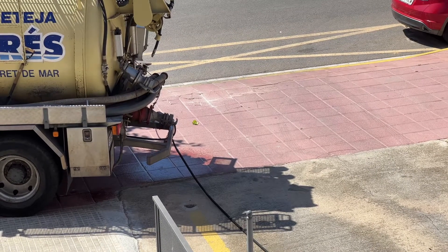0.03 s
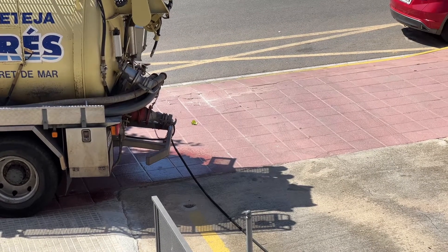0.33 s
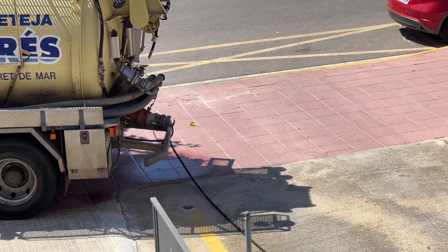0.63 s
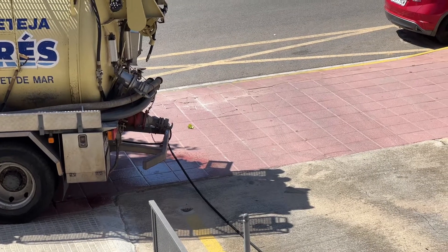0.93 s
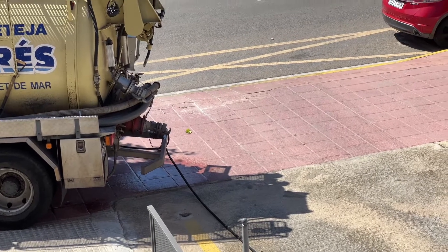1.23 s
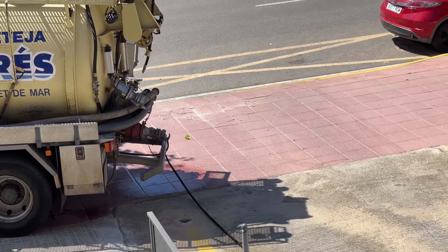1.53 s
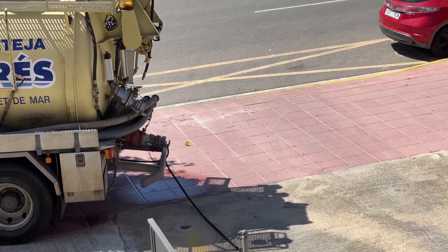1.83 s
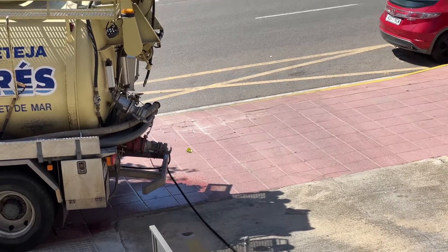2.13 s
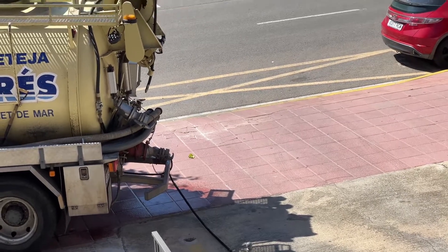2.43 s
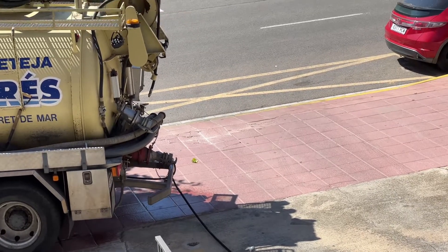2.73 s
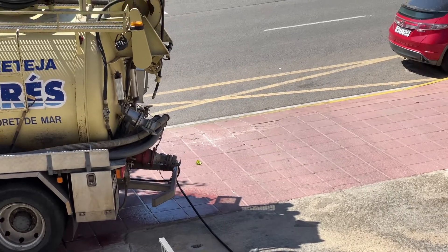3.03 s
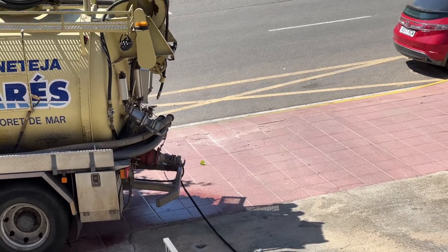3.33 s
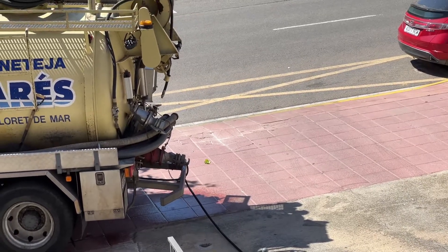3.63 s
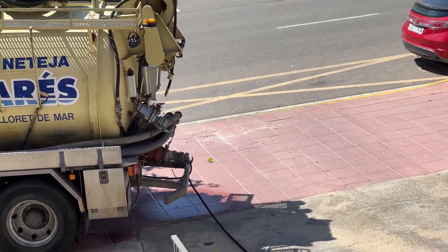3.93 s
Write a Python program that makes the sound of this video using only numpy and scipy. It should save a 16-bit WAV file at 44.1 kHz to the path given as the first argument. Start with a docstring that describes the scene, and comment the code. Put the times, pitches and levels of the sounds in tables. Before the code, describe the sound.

A tanker truck runs its pump at fast idle, droning, knocking and hissing outdoors.

```python
"""Beside a road, a tanker truck stands with its six-cylinder diesel at fast idle, driving a pump.
The pump has three plungers. On every turn its valves groan as liquid is forced past them, and its
strokes knock the pipes, always in the same pattern. Under that the engine drones, its casing rattles,
its fuel injectors tick and the machinery hisses. The exhaust booms louder towards the end,
and a few puffs of wind bump the microphone."""
import sys
import numpy as np
from scipy import signal
from scipy.fft import rfft, irfft, next_fast_len
from scipy.io import wavfile
from scipy.ndimage import map_coordinates

SR = 44100
rng = np.random.default_rng(int(sys.argv[2]) if len(sys.argv) > 2 else 0)


def store_wav(level_fs):
    """Save 16-bit WAV to argv[1]."""
    pcm = np.round(np.clip(np.atleast_2d(level_fs), -1, 1) * 32767)
    wavfile.write(sys.argv[1], SR, pcm.T.astype(np.int16))


N = 176400

FIRING_HZ, PUMP_TURN_S = 47.29, .22555  # in one engine cycle, each cylinder fires once

# tones of the engine block and chassis: (multiple of the engine cycle rate, level [dB])
BLOCK_TONES = [(27, -47.5), (30, -45.5), (36, -49), (37, -49), (39, -45), (42, -49.5), (58, -49.5),
               (76, -47.5), (99, -53.5), (149, -60)]
# how the low drone rises and falls: (time [s], gain [dB])
DRONE_GAIN = [(0, -8.5), (.3, -6), (.6, 1.5), (1, 0), (1.45, -3.5), (1.9, 2), (2.4, 0.5), (3.2, 0.5),
              (4, 0.5)]
# tones of the exhaust: (multiple of the engine cycle rate, relative level [dB])
EXHAUST_TONES = [(6, 0), (9, -8.5), (12, -2), (16, -4.5)]
# how loudly the exhaust booms: (time [s], level [dB])
EXHAUST_LEVEL = [(0, -44), (.4, -48), (1.5, -43.5), (1.9, -41), (2.6, -53), (2.85, -41.5), (3.1, -37),
                 (3.6, -35), (4, -33)]
# slight drift of the casing rattle and the hiss: (time [s], gain [dB])
RATTLE_HISS_GAIN = [(0, 0.9), (.8, 1), (1.6, 1), (2.6, 0.57), (4, 0.5)]
# how loudly the casing rings: (time [s], level [dB])
RING_LEVEL = [(0, -52.5), (.7, -48.5), (1.1, -51.5), (1.6, -53), (2.6, -53), (4, -54)]
# each cylinder's injector tick, in firing order: (relative level [dB])
CYLINDER_TICKS = [-2.5, -38, 4, 8, 7, -14]
# valve groans: (time in the turn [s], rise [s], fall [s], level [dB])
VALVE_GROANS = [(.037, .005, .0035, -35), (.0515, .004, .0042, -27.5), (.114, .0026, .003, -28),
                (.124, .004, .013, -26.5), (.08, .025, .06, -42.5)]
# pitch of the fluttering valve: (time in the turn [s], pitch [Hz])
VALVE_PITCH = [(0, 925), (.05, 922), (.1, 905), (.12, 890), (.14, 902), (.2255, 900)]
# pump knocks: (time in the turn [s], rise [s], fall [s], pitch [Hz], band width [Hz], level [dB])
PUMP_KNOCKS = [(0.03, 0.0091, 0.012, 1000, 130, -52), (0.1275, 0.0043, 0.0063, 810, 280, -44.5),
               (0.113, 0.0044, 0.0081, 1235, 160, -40), (.185, 0.0043, .007, 590, 130, -34),
               (0.2012, 0.0072, 0.0064, 738, 98, -32), (0.2, 0.0083, 0.013, 488, 144, -40),
               (0.218, 0.0042, 0.0095, 311, 54, -32.5), (0.1436, 0.0074, 0.008, 304, 31, -37.5)]
# the rush from each plunger: (time in the turn [s], rise [s], fall [s], level [dB])
PLUNGER_RUSHES = [(.044, .006, .005, -44.5), (.116, 0.0046, .008, -46.5), (.186, 0.0077, 0.013, -40.5)]
# short spurts of hiss: (time [s], band centre [Hz], level [dB])
HISS_SPURTS = [(.71, 5200, -49.5), (.86, 5130, -48), (2.234, 5060, -49), (2.255, 4420, -50),
               (2.287, 3760, -50), (2.748, 5160, -50), (2.992, 5240, -56), (3.117, 5200, -48),
               (3.138, 5150, -50)]
# soft puffs of wind: (time [s], rise and fall [s], level [dB])
WIND_PUFFS = [(0.077, 0.061, -35), (0.58, 0.02, -35), (0.73, 0.01, -36), (0.788, 0.0095, -22.5),
              (1.166, 0.038, -26.5), (2.18, 0.0079, -27), (2.578, 0.016, -45)]
# hard slaps of wind: (time [s], starting pitch [Hz], level [dB])
WIND_SLAPS = [(1.109, 520, -8.5), (1.119, 180, -14), (1.127, 340, -10), (1.144, 620, -8.5),
              (1.157, 190, -10.5), (1.168, 110, -17)]

# the tone colour of each noise: (frequency [Hz], relative level [dB])
RUMBLE_COLOUR = [(20, -34), (33, -27), (45, 6), (65, 3), (110, -0.5), (170, -0.5), (220, -1.5), (320, -1.5),
                 (400, -4.5), (600, -36), (1200, -71)]
RATTLE_COLOUR = [(150, -41), (300, -10.5), (420, 0.5), (590, 2), (680, -2), (900, 3), (1100, -5.5),
                 (1400, -4.5), (1620, -11), (2000, -8.5), (2500, -11.5), (2720, -11.5), (3000, -14.5),
                 (3350, -16.5), (3900, -23), (6000, -71)]
RING_COLOUR = [(2450, -28), (2610, -8), (2700, 6), (2790, -14), (2920, 0.5), (3040, -14), (3350, -4),
               (3600, -40)]
TICK_COLOUR = [(2000, -33), (4000, -9), (5200, 6), (5750, 1), (6200, 9), (6700, -12), (9000, -9),
               (10000, -48)]
RUSH_COLOUR = [(600, -27), (1200, 8), (1800, 5), (2350, 4), (2800, -11), (3400, -3), (3800, -7.5),
               (4300, -10), (5500, -21), (9000, -96)]
HISS_COLOUR = [(1500, -4), (3300, -10.5), (4000, -3.5), (4600, 0), (5200, 3.5), (5700, -2.5), (6000, 3.5),
               (6280, 4.5), (6500, -3.5), (6900, -5), (7480, -9), (7650, -5), (7850, -9), (8800, -32),
               (9500, -58)]
HIGH_HISS_COLOUR = [(6000, -30), (7800, -13), (8700, 5), (9500, -11), (10500, -4), (11300, 2), (12200, 1.5),
                    (13800, -3), (15600, -5)]
PUFF_COLOUR = [(20, -25), (40, -20), (65, 8.5), (130, -6), (250, -36), (500, -34), (1000, -83)]

# how wide the sound spreads between left and right: (frequency [Hz], side gain [dB])
STEREO_WIDTH = [(45, -12), (90, -28.5), (140, -12.5), (280, -21), (450, -14.5), (750, -8.5), (1250, -10),
                (1900, -13), (2300, -46), (3100, -34), (4000, -52), (7000, -53), (8500, -76), (15000, -20)]
# how much louder the left side is than the right: (frequency [Hz], gain [dB])
LEFT_GAIN = [(100, -.5), (600, 0), (800, 2), (1000, 2.4), (1300, 1.2), (1700, 3.2), (2050, 0)]
# how far the left side's wave runs ahead of the right: (frequency [Hz], phase [radians])
LEFT_LEAD = [(370, 0), (550, .3), (800, .75), (1300, .5), (1750, 0), (7400, 0), (8500, -1.1), (9400, -2.7),
             (10500, -3.3), (12000, -5), (12800, -6.28), (14300, -6.28), (15600, -8.3)]


def engine_drone():
    """The firing cylinders shake the block and chassis, which hum and rumble."""
    hum = engine_tones(BLOCK_TONES, waver_db=1.5)
    rumble = amp(-36) * engine_noise(RUMBLE_COLOUR, share=.23)
    return amp(curve(DRONE_GAIN)) * (hum + rumble)


def engine_casing():
    """The shaken casing rattles, with a thin, high ring on top."""
    rattle_db = -36 + curve(RATTLE_HISS_GAIN) + .47 * wobble(21)
    rattle = amp(rattle_db) * engine_noise(RATTLE_COLOUR, share=.35)
    ring = amp(curve(RING_LEVEL)) * engine_noise(RING_COLOUR, share=.35)
    return rattle + ring


def exhaust():
    """The exhaust booms with a few deep tones, the lowest at the firing rate."""
    return amp(curve(EXHAUST_LEVEL)) * engine_tones(EXHAUST_TONES, waver_db=-.5)


def injectors(first_tick_s=.0036, decay_s=.0094):
    """A fuel injector ticks at each firing, louder in some cylinders than in others."""
    firings = (clock() - first_tick_s) * FIRING_HZ
    count = np.floor(firings).astype(int)
    since_tick_s = (firings - count) / FIRING_HZ
    cylinder_db = np.array(CYLINDER_TICKS)[count % len(CYLINDER_TICKS)]
    strength = amp(-53 + cylinder_db + 1.5 * wobble(41.4))
    return strength * np.exp(-since_tick_s / decay_s) * noise(TICK_COLOUR)


def valve_groans(chatter_hz=192, chatter_peak_s=.1243, chatter_depth=.3):
    """A valve flutters and chatters on its seat whenever liquid is forced past it."""
    in_turn_s = clock() % PUMP_TURN_S
    pitch_hz = np.interp(in_turn_s, *np.transpose(VALVE_PITCH))
    phase = 2 * np.pi * np.cumsum(pitch_hz) / SR + .38 * wobble(160)
    flutter = np.array([np.sin(phase), np.cos(phase)])
    chatter = 1 + chatter_depth * np.cos(2 * np.pi * chatter_hz * (in_turn_s - chatter_peak_s))
    flow = strokes(VALVE_GROANS)
    roughness = amp(.6 * wobble(180))
    return flow * roughness * unit(chatter * flutter)


def pump_knocks():
    """Each stroke makes the pump and its pipes ring briefly at their own pitches."""
    out = np.zeros((2, N))
    for at_s, rise_s, fall_s, pitch_hz, width_hz, db in PUMP_KNOCKS:
        shaking = repeating_noise(PUMP_TURN_S, share=.33)
        band = filtered(shaking, lambda hz: 1 / (1 + ((hz - pitch_hz) / width_hz) ** 2) ** 2)
        loudness = np.abs(signal.hilbert(band))
        ring = band / np.sqrt(loudness + 1e-12)  # evened out: strokes have much the same force
        out += amp(db) * stroke(at_s, rise_s, fall_s) * unit(ring)
    return out


def plunger_rush():
    """Each plunger sends a swish through the pipes once a turn."""
    return noise(RUSH_COLOUR) * strokes(PLUNGER_RUSHES)


def machinery_hiss(spurt_width_hz=470):
    """The machinery hisses steadily, with a few scraping spurts and a faint, very high layer."""
    out = amp(-49 + curve(RATTLE_HISS_GAIN) + .81 * wobble(8.74)) * noise(HISS_COLOUR)
    for at_s, centre_hz, db in HISS_SPURTS:
        white = rng.standard_normal((2, N))
        band = filtered(white, lambda hz: 1 / (1 + ((hz - centre_hz) / spurt_width_hz) ** 4))
        out += amp(db) * swell(clock() - at_s, rise_s=.012, fall_s=.017) * unit(band)
    high_hiss = amp(-57 + .26 * wobble(14)) * noise(HIGH_HISS_COLOUR)
    return out + high_hiss


def wind(slap_rise_s=.007, slap_fall_s=.0135, pitch_drop_s=.012, side_db=-14):
    """Soft puffs, and one gust whose swirls slap the microphone with a falling pitch."""
    puffs = sum(amp(db) * swell(clock() - at_s, half_s, half_s) for at_s, half_s, db in WIND_PUFFS)
    out = puffs * noise(PUFF_COLOUR)
    for at_s, start_hz, db in WIND_SLAPS:
        age_s = np.maximum(clock() - at_s, 0)
        phase = 2 * np.pi * start_hz * pitch_drop_s * (1 - np.exp(-age_s / pitch_drop_s))
        rise = 1 - np.exp(-(age_s / slap_rise_s) ** 2)
        fall = np.exp(-(age_s / slap_fall_s) ** 4)
        out += amp(db) * rise * fall * np.array([np.sin(phase), np.cos(phase)])
    middle, side = out[0], amp(side_db) * out[1]
    return np.array([middle + side, middle - side])


def stereo_spread(pair):
    """Make left and right from a pair of sounds: one sits in the middle, the other adds width."""
    middle, side = pair[0], coloured(pair[1], STEREO_WIDTH)
    stereo = np.array([middle + side, middle - side])
    half = np.array([[.5], [-.5]])  # left and right each take half, in opposite directions
    return filtered(
        stereo, lambda hz: amp(half * along(LEFT_GAIN, hz)) * np.exp(1j * half * along(LEFT_LEAD, hz)))


def engine_tones(tones, waver_db):
    """Slightly unsteady tones that keep in step with the engine cycle."""
    cycles = (clock() + .0001 * wobble(3.06)) * FIRING_HZ / len(CYLINDER_TICKS)
    out = np.zeros((2, N))
    for multiple, db in tones:
        peak = np.sqrt(2) * amp(db + waver_db * wobble(5.2))
        out += peak * np.sin(2 * np.pi * (multiple * cycles + rng.random((2, 1))))
    return out


def engine_noise(colour, share):
    """A pair of shaped noises that partly repeat with every engine cycle."""
    cycle_s = len(CYLINDER_TICKS) / FIRING_HZ
    return unit(coloured(repeating_noise(cycle_s, share), colour))


def repeating_noise(period_s, share):
    """Two noises; a share (0 to 1) of their power comes back every period, the rest is new."""
    size = int(period_s * SR)
    loop = unit(irfft(np.exp(2j * np.pi * rng.random((2, size // 2 + 1))), size))
    periods = (clock() + .00012 * wobble(3.045)) / period_s
    place = (periods % 1 * size).astype(int) % size
    return np.sqrt(share) * loop[:, place] + np.sqrt(1 - share) * rng.standard_normal((2, N))


def stroke(at_s, rise_s, fall_s):
    """A swell at the same point in every pump turn, never quite equally strong."""
    from_peak_s = (clock() - at_s + PUMP_TURN_S / 2) % PUMP_TURN_S - PUMP_TURN_S / 2
    return swell(from_peak_s, rise_s, fall_s) * amp(.44 * wobble(4.28))


def strokes(rows):
    """Several strokes added into one loudness curve."""
    return sum(amp(db) * stroke(at_s, rise_s, fall_s) for at_s, rise_s, fall_s, db in rows)


def swell(t, rise_s, fall_s):
    """A rounded rise and fall around t = 0."""
    return np.exp(-.5 * (t / np.where(t < 0, rise_s, fall_s)) ** 2)


def noise(colour):
    """Two unrelated noises with the same tone colour."""
    return unit(coloured(rng.standard_normal((2, N)), colour))


def coloured(x, colour):
    """Shape a sound with a table of frequencies and levels."""
    return filtered(x, lambda hz: amp(along(colour, hz)))


def filtered(x, response):
    """Multiply each frequency in a sound by response(hz)."""
    size = next_fast_len(N + SR // 2)
    return irfft(rfft(x, size) * response(np.fft.rfftfreq(size, 1 / SR)), size)[..., :N]


def wobble(rate):
    """A smooth curve through `rate` random values a second."""
    return map_coordinates(rng.standard_normal(int(N * rate / SR) + 4), [clock() * rate])


def along(rows, hz):
    """Read between the rows of a frequency table, giving each octave equal room."""
    frequencies, values = np.transpose(rows)
    return np.interp(np.log(hz + 1), np.log(frequencies + 1), values)


def curve(rows):
    """Join the points of a time table with straight lines."""
    return np.interp(clock(), *np.transpose(rows))


def clock():
    """The time of each sample in seconds."""
    return np.arange(N) / SR


def unit(x):
    """Scale a sound to an average power of 1."""
    return x / np.sqrt(np.mean(x ** 2) + 1e-20)


def amp(db):
    """Turn decibels into a multiplier."""
    return 10 ** (np.asarray(db) / 20)


def scene():
    """The truck beside the road, and wind at the microphone."""
    engine = engine_drone() + engine_casing() + exhaust() + injectors()
    pump = valve_groans() + pump_knocks() + plunger_rush()
    return stereo_spread(engine + pump + machinery_hiss()) + wind()


def record(dry):
    """The microphone loses the deepest bass and the highest treble."""
    bottom_hz, top_hz = 33, 15700
    return filtered(dry, lambda hz: (hz < top_hz) * (1 - 1 / (1 + (hz / bottom_hz) ** 6)))


dry = scene()
out = record(dry)
store_wav(out)
```